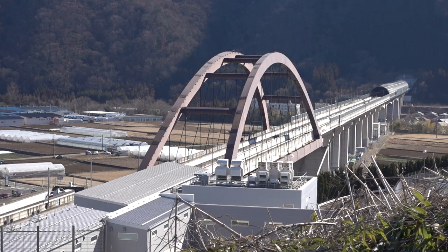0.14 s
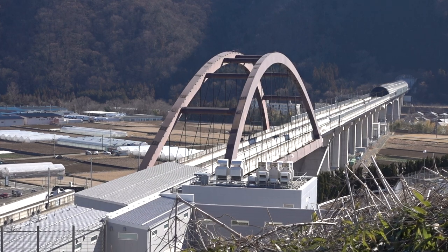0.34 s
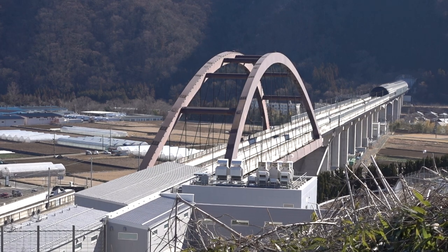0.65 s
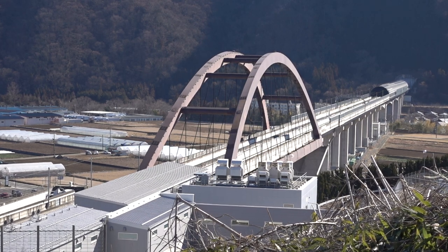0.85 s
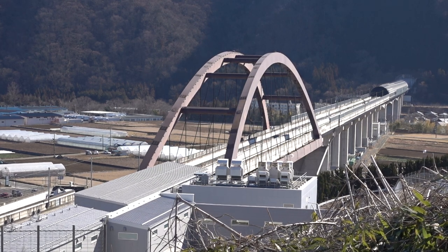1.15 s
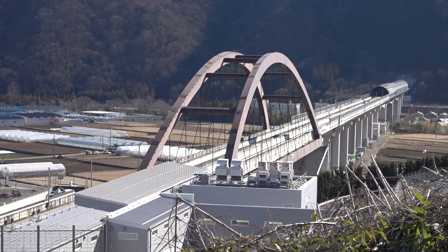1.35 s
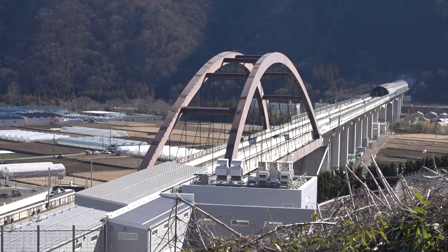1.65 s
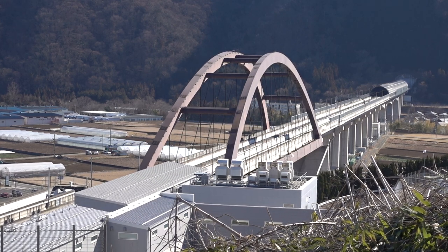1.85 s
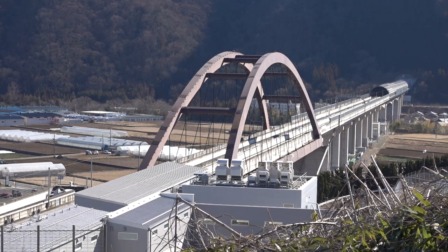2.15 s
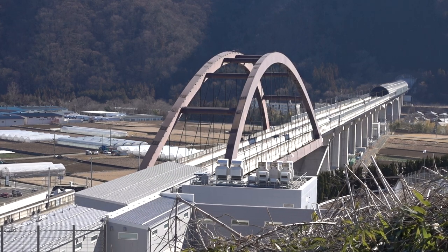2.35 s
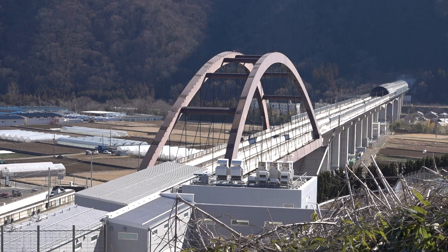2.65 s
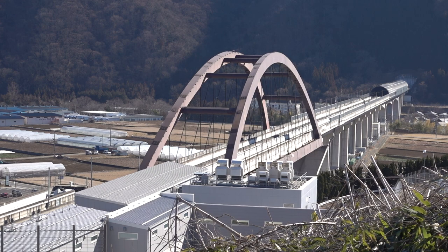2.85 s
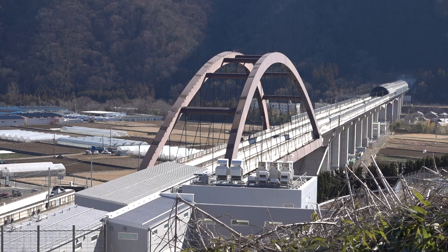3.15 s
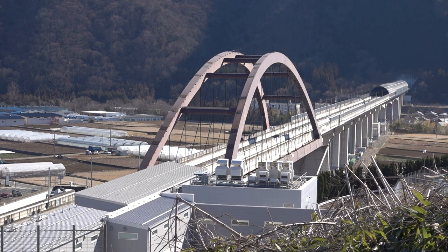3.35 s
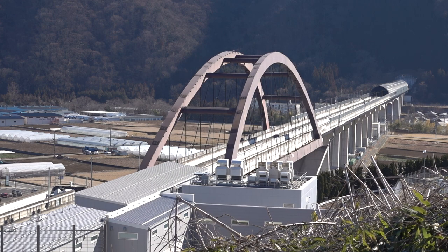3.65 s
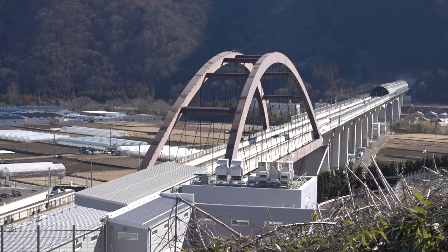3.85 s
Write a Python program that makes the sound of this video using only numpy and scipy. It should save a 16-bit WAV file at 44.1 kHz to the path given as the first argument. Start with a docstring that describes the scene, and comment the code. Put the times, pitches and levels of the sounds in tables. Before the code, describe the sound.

Fast train pass-by outdoors: loud torn-air roar and hiss, fading to a distant hollow howl.

```python
"""On a hillside above an open valley, a maglev train rushes past and runs away over a viaduct.
Torn air is coloured noise: a bright rush and hiss die as the tail goes by; roar and rumble linger.
Wavering sines make the narrow drone of the guideway; noise through resonances makes the viaduct's
ringing and a hollow howl. A small bird, swept sines with an echo, ticks three times as the noise
fades over a faint bed of valley air."""
import sys
import numpy as np
from scipy import signal
from scipy.fft import rfft, irfft
from scipy.io import wavfile
from scipy.ndimage import map_coordinates

SR = 44100
rng = np.random.default_rng(int(sys.argv[2]) if len(sys.argv) > 2 else 0)


def log_audio(samples):
    """Write samples as a 16-bit WAV file to the path given in sys.argv[1]."""
    # one column per channel
    frames = np.atleast_2d(samples).T
    # limit to full scale, then quantise
    limited = np.clip(frames, -1, 1)
    pcm = np.round(limited * 32767).astype(np.int16)
    wavfile.write(sys.argv[1], SR, pcm)


N = 176400
T = np.arange(N) / SR
HZ = np.maximum(np.arange(N // 2 + 1) * SR / N, 1)


def from_db(db):
    """Amplitude ratio: 20 dB is a factor of ten in pressure."""
    return 10 ** (np.asarray(db) / 20)


def rms_one(x):
    """Normalisation: scale a signal to unit root mean square."""
    return x / np.sqrt(np.mean(x ** 2) + 1e-20)


def in_time(rows):
    """Envelope: straight lines between (time, value) rows, at every sample."""
    return np.interp(T, *np.transpose(rows))


def at_hz(points):
    """Spectral curve: straight lines over log frequency between (Hz, value) points."""
    hz, value = np.transpose(points)
    return np.interp(np.log(HZ), np.log(hz), value)


def colour(points):
    """Spectral shaping: gain at every frequency, falling 12 dB per octave beyond the end points."""
    low_end = np.minimum(1, HZ / points[0][0]) ** 2
    high_end = np.minimum(1, points[-1][0] / HZ) ** 2
    return from_db(at_hz(points)) * low_end * high_end


def drift(rate):
    """Random modulation: white noise through two equal poles at rate (Hz), rms 1."""
    step = 40  # samples between drawn values
    pole = np.exp(-2 * np.pi * rate * step / SR)
    noise = rng.standard_normal(N // step + 2002)
    slow = signal.lfilter([1], [1, -2 * pole, pole * pole], noise)[2000:]  # settled part
    return np.interp(np.arange(N) / step, np.arange(len(slow)), rms_one(slow))


# Torn air along the train. Each row of a level: time in seconds, level in dB before the layer's offset.
ROAR_LEVEL = [(0, -19), (.09, -16), (.22, -19.5), (.45, -16), (.85, -18.5), (1.06, -20.5), (1.12, -24.5),
              (1.72, -28), (2.1, -34), (2.5, -39.5), (3.2, -42.5), (4, -44.5)]
RUSH_LEVEL = [(0, -23), (.69, -23), (.74, -20.5), (.79, -22.5), (1.07, -24), (1.11, -27), (1.2, -29),
              (1.45, -35.5), (1.77, -41), (1.92, -46), (2.4, -58), (4, -72)]
HISS_LEVEL = [(.04, -36.5), (.16, -38.5), (.22, -36), (.32, -38), (.83, -38.5), (.93, -38.3), (1.02, -41),
              (1.085, -39.5), (1.14, -43.8), (1.5, -58.5), (1.62, -64), (1.69, -61.5), (1.9, -75.5),
              (2.3, -91)]
RUMBLE_LEVEL = [(0, -35.5), (.12, -32.5), (.95, -32.5), (1.35, -39), (1.6, -47.5), (2, -51.5), (2.6, -55.5),
                (4, -60.5)]
# The spectra of that air. Each row: frequency in Hz, relative density in dB per Hz.
ROAR_COLOUR = [(200, -17), (290, -9), (370, -9.5), (480, -1.5), (620, 0.5), (760, -1), (950, -2),
               (1300, -5.5), (1700, -12.5), (2400, -21), (4000, -55)]
RUSH_COLOUR = [(600, -15), (1100, -3.5), (1600, 3), (2050, -2.5), (2600, -1), (3300, -6.5), (4300, -11.5),
               (5500, -18.5), (8000, -27.5), (12000, -51)]
HISS_COLOUR = [(3000, -15), (5000, 4.5), (6500, 3.5), (8000, 0.5), (10000, -1.5), (12500, -3.5),
               (15500, -10.5)]
RUMBLE_COLOUR = [(20, -32), (40, -24), (70, -11), (115, -4), (155, -1), (250, 1.5), (340, -7), (500, -21),
                 (1000, -50)]
ROAR_DB, RUSH_DB, HISS_DB, RUMBLE_DB = 0.5, 4.5, 6, 2.5  # offsets added to the levels


def airflow():
    """Aerodynamic noise: four bands of turbulence; the higher the band, the sooner it dies."""
    rumble = turbulence(RUMBLE_COLOUR, in_time(RUMBLE_LEVEL) + RUMBLE_DB, flutter_db=0.7, rate=7.5)
    roar = turbulence(ROAR_COLOUR, in_time(ROAR_LEVEL) + ROAR_DB, flutter_db=.5, rate=9.5)
    rush = turbulence(RUSH_COLOUR, in_time(RUSH_LEVEL) + RUSH_DB, flutter_db=0.8, rate=39)
    hiss = turbulence(HISS_COLOUR, in_time(HISS_LEVEL) + HISS_DB, flutter_db=.5, rate=52)
    return rumble + roar + rush + hiss


def turbulence(spectrum, level_db, flutter_db, rate):
    """Turbulent noise: a broad random spectrum whose level flutters (rms in dB, rate in Hz)."""
    return train_noise(colour(spectrum)) * from_db(level_db + flutter_db * drift(rate))


# Level difference between the ports. Each row: frequency in Hz, left minus right in dB at share 1.
BALANCE_DB = [(650, 2.5), (850, 6.5), (1100, 6), (1550, 3.5), (2100, 6), (2900, 5.5), (3500, 3),
              (4300, 4.5), (7000, 1.5), (13000, -1)]
# Share of that imbalance, greatest as the tail goes by. Each row: time in seconds, share.
LEAN = [(0, 0.93), (.6, 0.78), (1.05, 1.25), (2, 1.02), (4, 0.88)]
# Coherence of the two ports. Each row: frequency in Hz, diffuse part against direct part in dB.
DIFFUSE_DB = [(300, -24), (650, -18.5), (870, -12), (1250, -14.5), (1600, -6), (1950, -7.5), (2400, -3),
              (3500, -6), (6500, -10), (10000, -3), (15000, -2)]
# Later arrival of the treble at the right port. Each row: time in seconds, lag in ms.
LAG_MS = [(.6, 0.037), (1.15, 0.071)]
LAG_ABOVE_HZ, TREBLE_PHASE_RAD = 1490, 0.5  # the right treble is also shifted in phase


def train_noise(gain):
    """Two-port hearing: level, phase and arrival differences place coloured noise; rms 1."""
    mid, side = rfft(rng.standard_normal((2, N))) * gain
    sides = np.array([[1], [-1]])
    diffuse = from_db(at_hz(DIFFUSE_DB))
    pair = (mid + sides * diffuse * side) / np.sqrt(1 + diffuse ** 2)

    ratio = from_db(at_hz(BALANCE_DB))
    imbalance = irfft(pair * (ratio - 1) / (ratio + 1), N)
    left, right = irfft(pair, N) + sides * in_time(LEAN) * imbalance

    treble = 1 / (1 + (LAG_ABOVE_HZ / HZ) ** 8)
    right = rfft(right) * np.exp(-1j * TREBLE_PHASE_RAD * treble)
    heard_at = (T - in_time(LAG_MS) / 1000) * SR  # moving delay, in samples
    late_treble = map_coordinates(irfft(right * treble, N), [heard_at], order=3, mode="grid-wrap")
    return rms_one(np.array([left, irfft(right * (1 - treble), N) + late_treble]))


# The guideway drone. Each row: time in seconds, level in dB.
DRONE_LEVEL = [(0, -38.5), (.75, -43), (.85, -32.5), (1.07, -30), (1.3, -37.5), (1.44, -33), (1.54, -46),
               (1.6, -34), (1.76, -32), (1.83, -47.5), (2.13, -45), (2.22, -53.5), (3.1, -59),
               (3.35, -55.5), (4, -57)]
# A tone near the drone's octave that swells briefly. Each row: time in seconds, level in dB.
OCTAVE_LEVEL = [(1.0, -50), (1.78, -48.5), (1.88, -39), (2.05, -47), (2.25, -62.5), (4, -66)]
DRONE_HZ, OCTAVE_HZ, DRONE_WANDER_HZ = 223.5, 442, 1.26


def guideway_drone():
    """Tonal radiation: the guideway's narrow drone and a tone near its octave."""
    low = wavering_tone(DRONE_HZ, DRONE_LEVEL, DRONE_WANDER_HZ)
    return low + wavering_tone(OCTAVE_HZ, OCTAVE_LEVEL, DRONE_WANDER_HZ)


def wavering_tone(hz, level, wander_hz):
    """Frequency and amplitude modulation: a sine wavers on its way through the air."""
    flutter_db = 1.8
    phase = 2 * np.pi * np.cumsum(hz + wander_hz * drift(12.26)) / SR
    return np.sqrt(2) * np.sin(phase) * from_db(in_time(level) + flutter_db * drift(9.8))


# Resonances of the viaduct. Each row: frequency in Hz, half-power width in Hz, relative power in dB.
VIADUCT_MODES = [(111.3, 26, -13.5), (318, 14, -9.5), (1234, 210, 3), (2370, 260, -2.5), (4200, 330, -23.5)]
# Their ringing as the train crosses. Each row: time in seconds, level in dB.
VIADUCT_LEVEL = [(.9, -31.5), (1.25, -29.5), (1.55, -32), (1.74, -31.5), (1.95, -38.5), (2.4, -48.5),
                 (4, -65)]


def viaduct():
    """Structural resonance: the viaduct rings as the train crosses it."""
    return ringing(VIADUCT_MODES, VIADUCT_LEVEL)


def ringing(resonances, level):
    """Resonant filtering: noise passes only in narrow bands about each resonance."""
    power = np.zeros(len(HZ))
    for hz, width, db in resonances:
        detuning = (HZ - hz) / width * 1.3
        power += from_db(db) ** 2 / width / (1 + detuning ** 2) ** 2
    return train_noise(np.sqrt(power)) * from_db(in_time(level))


# The howl's resonances. Each row: frequency in Hz, half-power width in Hz, relative power in dB.
HOWL_MODES = [(329, 15, -14.5), (555, 46, -10), (633.4, 53, -1)]
# The howl of the receding train. Each row: time in seconds, level in dB.
HOWL_LEVEL = [(0, -43), (1.0, -33), (1.8, -36.5), (2.4, -42), (3.3, -48.5), (4, -51)]
# The narrow hum at the heart of the howl. Each row: time in seconds, level in dB before the lean.
HUM_LEVEL = [(1.4, -46), (2.1, -45), (2.9, -47), (3.55, -49), (3.8, -57)]
HUM_HZ, HUM_WANDER_HZ = 638.4, 7


def howl():
    """Resonance with a tone: the receding train's hollow howl and its hum, a little to the left."""
    half_balance = np.array([[.5], [-.5]]) * np.interp(HUM_HZ, *np.transpose(BALANCE_DB))
    hum = from_db(half_balance) * wavering_tone(HUM_HZ, HUM_LEVEL, HUM_WANDER_HZ)
    return ringing(HOWL_MODES, HOWL_LEVEL) + hum


# Bird ticks. Each row: start in seconds, middle pitch in Hz, peak level in dB, length in seconds.
TICKS = [(2.288, 7000, -63, .008), (2.778, 6720, -56.5, .0125), (3.578, 6700, -60, .013)]
TICK_SWEEP_HZ, TICK_ECHO_DB, TICK_T60_S = 850, -2, .65


def bird():
    """Frequency sweep and reverberation: ticks dip and rise, scattered by the wooded slope."""
    direct = np.zeros(N)
    for start, hz, db, length in TICKS:
        along = np.clip((T - start) / length, 0, 1)
        pitch = hz + TICK_SWEEP_HZ * (abs(2 * along - 1) - .5) + 130 * drift(150)
        direct += from_db(db) * np.sin(np.pi * along) * np.sin(2 * np.pi * np.cumsum(pitch) / SR)
    scatter = rng.standard_normal((2, SR)) * from_db(-60 * T[:SR] / TICK_T60_S)
    echo = signal.fftconvolve(direct[None], rms_one(scatter) / np.sqrt(SR))[:, :N]
    two_ports = np.array([np.roll(direct, 2), direct])  # left two samples later
    return two_ports + from_db(TICK_ECHO_DB) * echo


# Spectrum of the valley air. Each row: frequency in Hz, relative density in dB per Hz.
AIR_COLOUR = [(25, 16), (55, 37), (120, 23), (2000, -2), (6000, 1.5), (15500, -3)]
AIR_DB = -59.5


def valley_air():
    """Diffuse field: steady coloured noise, independent in the two channels."""
    noise = irfft(rfft(rng.standard_normal((2, N))) * colour(AIR_COLOUR), N)
    return from_db(AIR_DB) * rms_one(noise)


def scene():
    """Superposition: the sounds of train, viaduct, bird and air add."""
    return airflow() + guideway_drone() + viaduct() + howl() + bird() + valley_air()


MONO_BELOW_HZ, CUTOFF_HZ = 370, 15750


def record(dry):
    """Filtering and saturation: bass merges to mono, peaks are rounded, the top is cut steeply."""
    mid, side = dry.mean(axis=0), (dry[0] - dry[1]) / 2
    side = signal.sosfiltfilt(signal.butter(2, MONO_BELOW_HZ, "high", fs=SR, output="sos"), side)
    pair = np.array([mid + side, mid - side])
    rounded = pair / (1 + (pair / .9) ** 8) ** (1 / 8)  # never beyond 0.9
    return signal.sosfilt(signal.ellip(12, .1, 90, CUTOFF_HZ, fs=SR, output="sos"), rounded)


dry = scene()
out = record(dry)
log_audio(out)
```